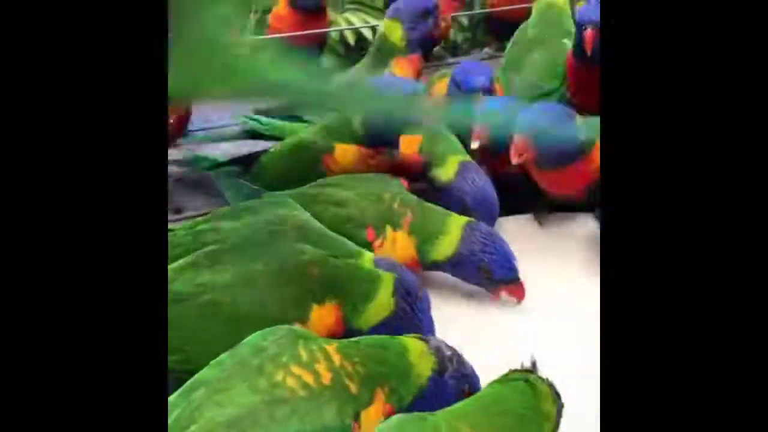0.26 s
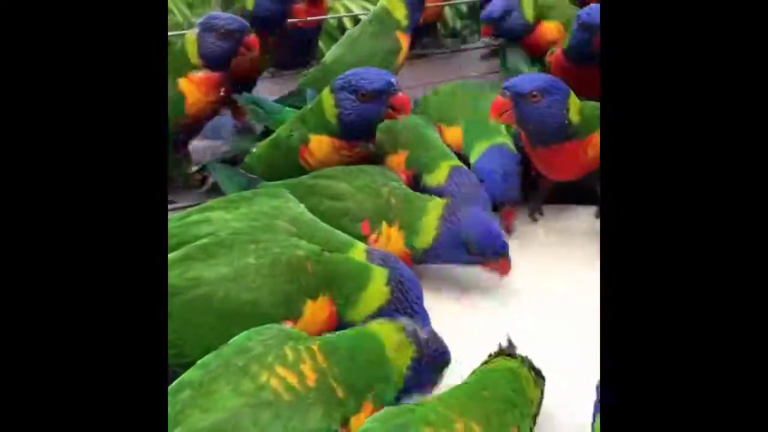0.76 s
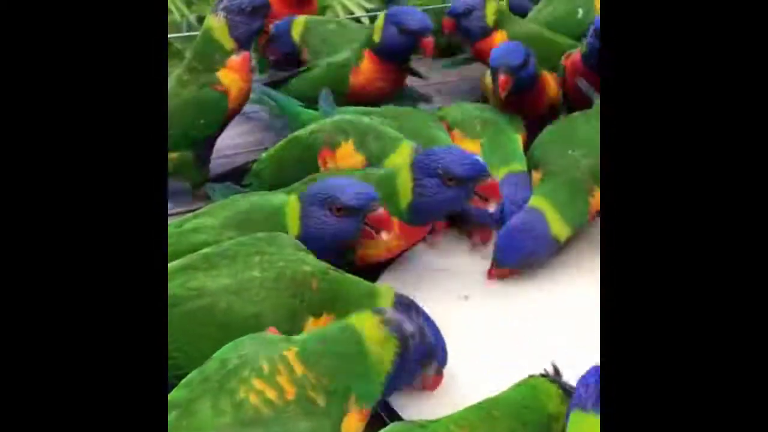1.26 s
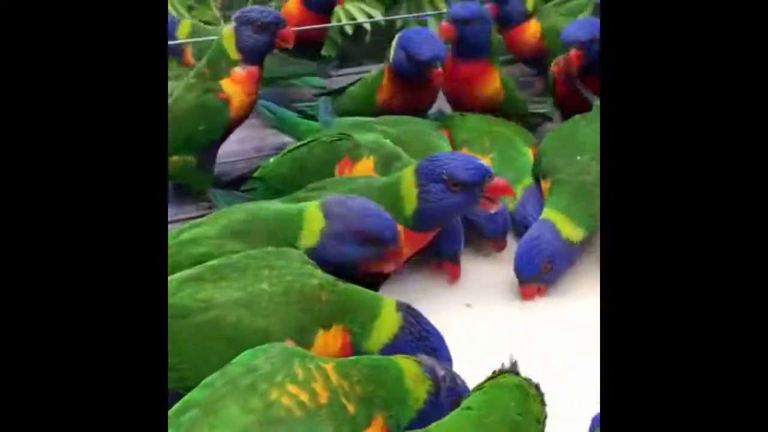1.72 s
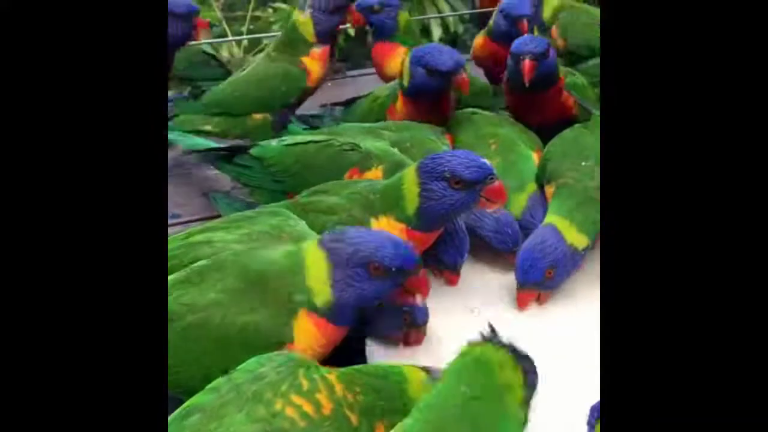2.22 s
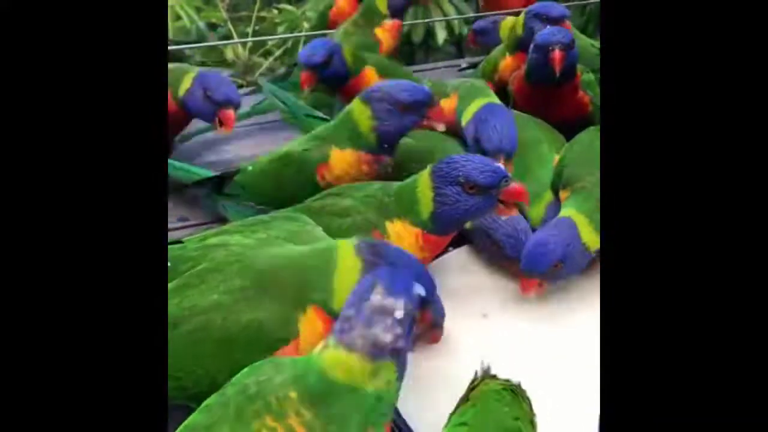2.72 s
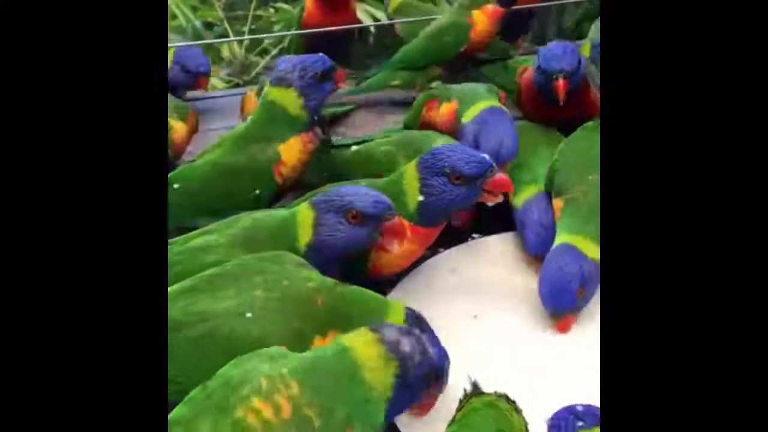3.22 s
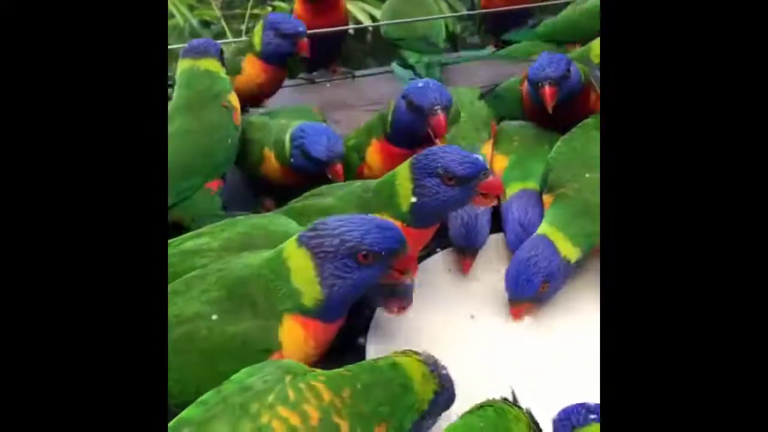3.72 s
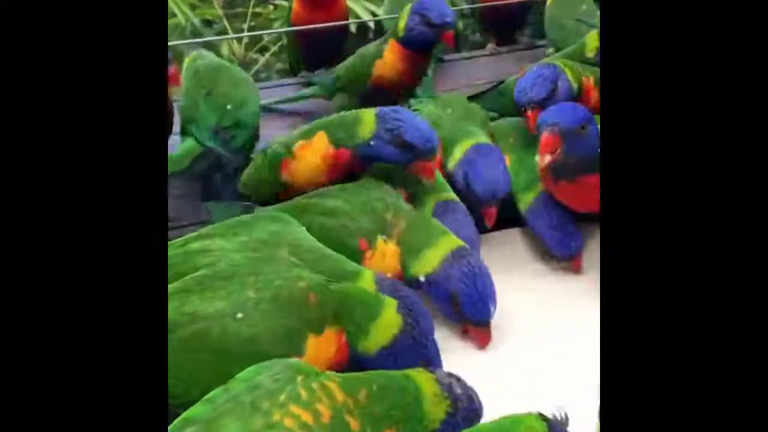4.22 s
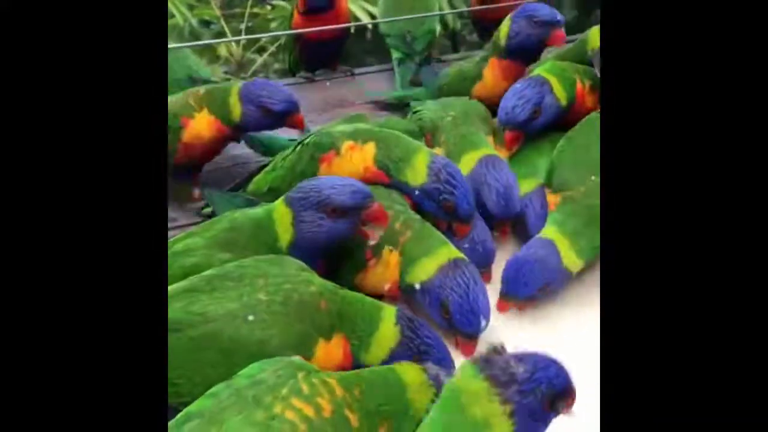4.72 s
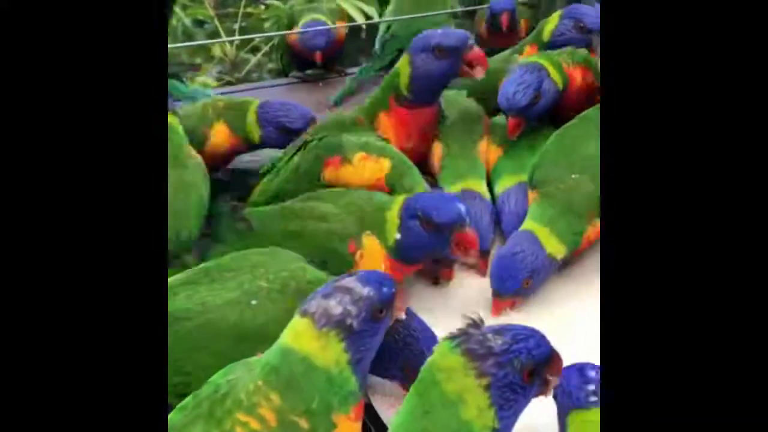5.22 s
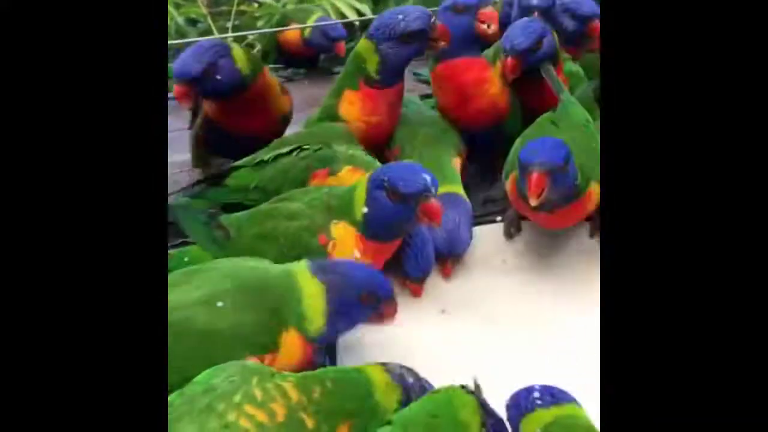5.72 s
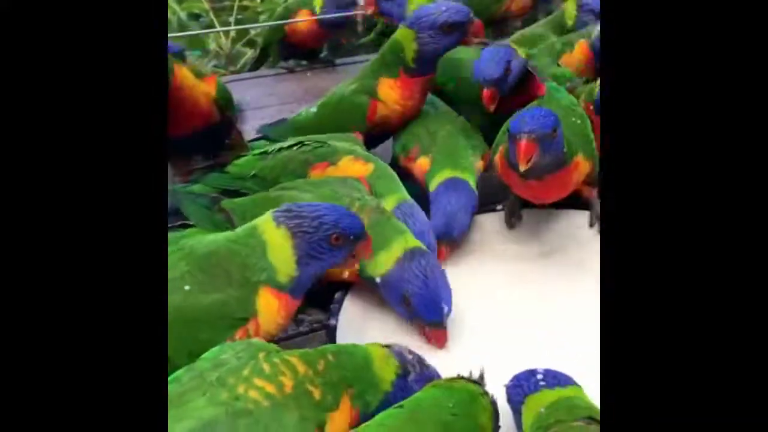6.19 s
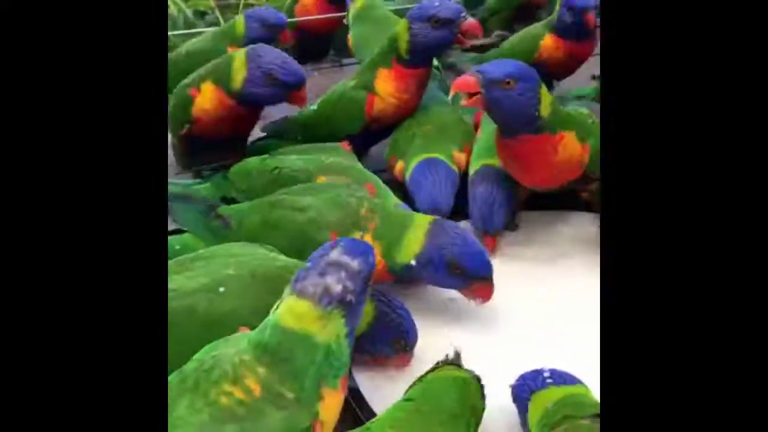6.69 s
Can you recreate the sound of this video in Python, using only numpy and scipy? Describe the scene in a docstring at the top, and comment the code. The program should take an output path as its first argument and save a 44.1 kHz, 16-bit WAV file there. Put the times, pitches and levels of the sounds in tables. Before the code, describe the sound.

A sharp, high whistle opens the sound, and a bird flaps past close by, with about seven quick, low puffs of wing beats fading by 0.5 seconds. From there a flock of small parrots calls continuously near the microphone. Short, harsh, fluttering screeches follow one another with hardly a gap and dominate the first second. Clean, high whistles that glide and warble overlap them, clustering around 1.3 to 1.8, 2.1 to 2.8 and 3.3 to 4 seconds. At about 4.6 seconds one raspy screech swells into the loudest call. Whistles and screeches then mix busily until about 6 seconds, when the screeches become softer and duller while quick whistles continue to the end, near 7 seconds. The setting is outdoors with very little echo. Faint chirps from birds further off and a soft rumble and hiss of air lie underneath throughout.

```python
"""A sharp whistle and a bird flapping past, then a close flock of small parrots at an outdoor feeding dish.
Their harsh, fluttering screeches overlap with clean, warbling whistles. Both come from the syrinx,
a bird's voice box: it sings a gliding tone for a whistle, and its membranes flutter and chop the tone
for a screech. Each wing beat is a low puff of air. Faint far chatter and air rumble lie below."""
import sys
import numpy as np
from scipy import signal
from scipy.fft import rfft, irfft
from scipy.io import wavfile
from scipy.ndimage import uniform_filter1d, minimum_filter1d

SR = 44100
rng = np.random.default_rng(int(sys.argv[2]) if len(sys.argv) > 2 else 0)


def file_out(sig):
    """Save sig as 16-bit WAV at sys.argv[1]."""
    # one column per channel
    cols = np.atleast_2d(sig).T
    # limit, then scale
    lim = np.clip(cols, -1, 1)
    pcm = np.round(lim * 32767).astype(np.int16)
    wavfile.write(sys.argv[1], SR, pcm)


N = 306495
CUTOFF_HZ = 12700   # top of the sound's range


def from_db(db):
    """Turns a level in dB into a number to multiply by."""
    return 10 ** (np.asarray(db) / 20)


def rms_one(x):
    """Scales x to an average strength (rms) of 1."""
    return x / np.sqrt(np.mean(x ** 2) + 1e-20)


def coloured(x, gain_db):
    """Turns each frequency in x up or down by gain_db(hz)."""
    hz = np.maximum(np.arange(len(x) // 2 + 1) * SR / len(x), 1)
    return irfft(rfft(x) * from_db(gain_db(hz)), len(x))


def at_hz(points, hz):
    """Reads a level between the rows of a table, with octaves evenly spaced."""
    table_hz, table_db = np.transpose(points)
    return np.interp(np.log(hz), np.log(table_hz), table_db)


def bump(hz, centre_hz, half_width_hz, db):
    """A rounded peak around one frequency, or a dip if db is negative."""
    return db / (1 + ((hz - centre_hz) / half_width_hz) ** 2)


def wobble(size, rate_hz):
    """A random wiggle of strength 1 that changes about rate_hz times a second."""
    r = np.exp(-2 * np.pi * rate_hz / SR)
    return rms_one(signal.lfilter([1], [1, -2 * r, r * r], rng.standard_normal(size + 2000))[2000:])


def fades(t, rise_s, fall_s):
    """Gives a call a soft start and end."""
    return np.sin(np.pi / 2 * np.clip(np.minimum(t / rise_s, (t[-1] - t) / fall_s), 0, 1)) ** 2


def swell(t, early_db, late_db):
    """Slides a call's loudness from an early level to a late one."""
    return from_db(np.interp(t / t[-1], [.2, .8], [early_db, late_db]))


def add(out, start_s, sound):
    """Mixes a sound into out at its start time."""
    at = round(start_s * SR)
    out[at:at + len(sound)] += sound[:N - at]


# The air's noise from low to high: f/Hz, relative level/dB
AIR_COLOUR = [(20, -36), (45, -2.5), (110, 2), (300, -11), (800, -10), (4000, -10), (12000, -19)]
# How the gusts rise and fall: t/s, relative level/dB
GUST_LEVELS = [(0.63, -52.5), (3.13, -58.5), (6.95, -51)]


def air():
    """Moving air rumbles and hisses; the hiss follows the gusts less than the rumble does."""
    split_hz, lift_db, hiss_share = 250, 5.5, .73
    noise = rng.standard_normal(N)
    rumble = coloured(noise, lambda hz: at_hz(AIR_COLOUR, hz) - 90 * (hz > split_hz))
    hiss = coloured(noise, lambda hz: at_hz(AIR_COLOUR, hz) - 90 * (hz <= split_hz))
    gusts_db = np.interp(np.arange(N) / SR, *np.transpose(GUST_LEVELS))
    swing_db = gusts_db - gusts_db.mean() + .31 * wobble(N, 1.1)
    mixed = rumble * from_db(swing_db) + hiss * from_db(hiss_share * swing_db)
    return from_db(gusts_db.mean() + lift_db) * mixed / np.std(rumble + hiss)


def far_chatter(count):
    """Birds further off give short, faint, gliding calls at random times."""
    out = np.zeros(N)
    for when, span, height, loudness in rng.random((count, 4)):
        t = np.arange(round((.02 + .05 * span) * SR)) / SR
        pitch_hz = 1300 * 3 ** height * (1 + .08 * wobble(len(t), 15) + .03 * wobble(len(t), 300))
        phase = 2 * np.pi * np.cumsum(pitch_hz) / SR
        add(out, when * N / SR, np.sin(phase) * from_db(-54 + 14 * loudness) * fades(t, .008, .008))
    return out


def wings():
    """A bird flaps past: each downstroke pushes a short, low wave of air, over a fading gust."""
    first_s, gap_s, nearest_beat, thump_hz = .051, .071, 2, 62
    out = np.zeros(N)
    t = np.arange(round(.07 * SR)) / SR
    push = -np.sin(2 * np.pi * thump_hz * t) * (t / .0062) * np.exp(1 - t / .0067)
    for beat in range(7):
        level_db = -15 - 1.3 * (beat - nearest_beat) ** 2
        add(out, first_s + gap_s * beat, from_db(level_db) * push)
    low_band = signal.butter(2, [35, 95], "band", fs=SR, output="sos")
    gust = from_db(-27) * rms_one(signal.sosfilt(low_band, rng.standard_normal(N)))
    return out + gust * np.clip(1 - np.arange(N) / SR / .5, 0, 1)   # gone in half a second


# The overtone an octave up is strong where the throat rings with it.
# Columns: note f/Hz, overtone level/dB against the note at medium effort
OCTAVE_LEVELS = [(1500, -9), (2400, 10.5), (2900, 0.5), (3300, -8), (4100, -16)]
# One whistled note a row: start t/s, length t/s, glide from f/Hz, glide to f/Hz, warble swing f/Hz,
# warble half-turns (it settles after the last whole one), early level/dB, late level/dB
WHISTLE_NOTES = [ (.001, 0.051, 3780, 3690, -360, 1.97, -10, -10),
                 (0.206, 0.055, 3035, 3280, -230, 0.77, -19.5, -14),
                 (0.424, 0.038, 2370, 2320, 62, 0.81, -34.5, -34.5),
                 (0.465, 0.019, 2030, 2120, 5, 1, -36, -23),
                 (1.136, 0.086, 4150, 4640, -250, 1.1, -26, -22.5),
                 (1.34, 0.033, 2370, 3120, -61, 1.7, -18, -24),
                 (1.362, 0.039, 2467, 2540, 0, 0.89, -22, -19),
                 (1.393, 0.021, 2580, 3410, 250, 0.91, -20, -12.5),
                 (1.411, 0.015, 4210, 4240, 5, 1, -8, -9), (1.425, 0.041, 2850, 3220, -6, 1.3, -16.5, -9.5),
                 (1.459, 0.021, 2700, 2505, -47, 1.3, -18, -20), (1.479, 0.015, 3200, 3150, 0, 1, -16, -22),
                 (1.449, 0.062, 4230, 4087, -600, 1.64, -13, -10.5),
                 (1.508, 0.038, 3100, 3470, -3, 1, -26.5, -21.5),
                 (1.546, 0.05, 2424, 3210, 359, 1.16, -27, -23.5),
                 (1.64, 0.036, 2650, 2880, -6, 1, -31, -21),
                 (1.672, 0.022, 2450, 3080, -150, 1.3, -22.5, -21),
                 (1.693, 0.041, 4550, 4310, -3, 1, -10, -9.5),
                 (1.728, 0.052, 3060, 3230, -74, 1.6, -15, -11),
                 (1.781, 0.022, 4210, 4340, -3, 1, -11.5, -15.5),
                 (2.074, 0.064, 4120, 4280, 12, 1.1, -19.5, -20.5),
                 (2.118, 0.068, 3110, 3166, -28, 0.83, -22, -23.5),
                 (2.174, 0.069, 3980, 4350, 262, 1.15, -24, -14.5),
                 (2.278, 0.052, 3350, 3000, 5, 1.1, -13, -12.5), (2.319, 0.02, 3960, 3780, 2, 1, -7, -5.5),
                 (2.336, 0.028, 3080, 3070, 4, 1, -14, -14), (2.36, 0.021, 3930, 3950, 0, 1, -5.5, -11),
                 (2.38, 0.027, 3020, 3680, -200, 1.2, -12.5, -12),
                 (2.401, 0.056, 4400, 3950, 18, 1, -9.5, -16),
                 (2.435, 0.067, 3203, 3200, -8, 0.76, -13.5, -13.5),
                 (2.599, 0.086, 3185, 3620, 20, 1.6, -20.5, -19),
                 (2.765, 0.063, 4090, 3933, -600, 1.75, -14, -8),
                 (2.976, 0.082, 3110, 3610, 11, 0.58, -24, -19),
                 (3.282, 0.12, 4490, 4650, 198, 4.4, -17, -19),
                 (3.372, 0.073, 3720, 3540, -280, 4.9, -9.5, -12.5),
                 (3.449, 0.034, 3450, 3460, -6, 1, -16, -19), (3.497, 0.04, 2483, 2410, -14, 1, -20.5, -25),
                 (3.548, 0.089, 1500, 1550, -6, 1.6, -36.5, -31),
                 (3.566, 0.06, 4080, 4270, 97, 2.9, -19, -11.5),
                 (3.587, .05, 2706, 3315, -100, 2.2, -22, -18), (3.624, 0.017, 3235, 3100, -5, 1, -17, -21),
                 (3.634, 0.033, 2700, 3100, -12, 1.2, -17.5, -19.5),
                 (3.664, 0.16, 2930, 3590, 158, 2.58, -21.5, -16),
                 (3.673, 0.096, 2390, 2040, 110, 1.9, -31.5, -40),
                 (3.978, 0.065, 4020, 4080, -480, 1.7, -11.5, -6),
                 (4.159, 0.15, 2850, 3190, 209, 1.95, -28.5, -30.5),
                 (4.39, 0.1, 4850, 5600, 149, 1.3, -23, -19),
                 (4.86, 0.068, 4180, 3880, -550, 1.3, -12, -18),
                 (4.89, 0.031, 3770, 3880, 9, 0.82, -18, -11.5),
                 (4.916, 0.047, 4540, 4460, 1, 1, -19.5, -23),
                 (4.943, 0.063, 3330, 3314, 13, 0.6, -18.5, -15),
                 (4.977, 0.067, 1447, 1520, -5, 0.95, -25, -25), (5.077, 0.048, 3900, 3700, 2, 1, -15, -19),
                 (5.116, 0.092, 2716, 2785, 73, 1.22, -22, -19),
                 (5.177, 0.05, 4150, 4440, 109, 1.45, -13.5, -9),
                 (5.22, .054, 4380, 4170, -400, 1.34, -8, -14.5),
                 (5.272, 0.054, 3540, 3580, 514, 1.25, -13.5, -17),
                 (5.382, 0.0324, 2580, 2840, 0, 1.2, -33.5, -25),
                 (5.412, 0.022, 2450, 3640, -250, 1.5, -25.5, -22),
                 (5.434, 0.035, 4360, 4390, -1, 1, -15.5, -12),
                 (5.465, 0.062, 3155, 3180, -150, 0.99, -22.5, -17),
                 (5.523, 0.028, 4150, 4400, 0, 1, -14, -22), (5.875, 0.07, 2185, 2063, -8, 1.8, -29, -20),
                 (5.88, 0.087, 3010, 3420, 204, 1.2, -23, -31),
                 (5.94, 0.046, 3600, 3835, 156, 1.28, -14.5, -11.5),
                 (5.975, 0.085, 3905, 3880, -520, 1.97, -10.5, -15),
                 (6.05, 0.04, 2920, 2940, 4, 1.3, -19, -21),
                 (6.097, 0.068, 2837, 3310, 372, 2.01, -19.5, -16),
                 (6.153, 0.015, 3970, 4300, 12, 0.43, -5, -6),
                 (6.169, 0.037, 2770, 3275, -100, 1.07, -18, -15),
                 (6.203, 0.02, 4045, 4080, 58, 1.4, -7.5, -8),
                 (6.254, 0.054, 4160, 4650, 83, 0.98, -26.5, -20),
                 (6.304, 0.05, 2840, 2660, 132, 1.8, -19.5, -16.5),
                 (6.352, 0.042, 3397, 2780, 79, 1.6, -14, -19),
                 (6.399, 0.11, 2980, 3170, 14, 1.5, -25, -25.5),
                 (6.514, 0.076, 3960, 4340, -400, 2.12, -24.5, -18.5),
                 (6.586, 0.078, 3340, 3350, 12, 1, -20, -24.5),
                 (6.672, 0.068, 3940, 3980, 351, 1.12, -15.5, -21),
                 (6.708, 0.088, 3190, 3190, -10, 1.4, -25, -27),
                 (6.754, 0.04, 4040, 3240, 6, 1, -15.5, -38),
                 (6.797, 0.055, 3240, 4450, 246, 1.1, -17.5, -13),
                 (6.851, 0.071, 3193, 3260, -11, 0.85, -21.5, -22.5)]


def whistles():
    """The syrinx sings tones that glide and warble; the harder the bird blows, the more overtones."""
    out = np.zeros(N)
    for start, length, from_hz, to_hz, swing_hz, turns, early_db, late_db in WHISTLE_NOTES:
        t = np.arange(round(length * SR)) / SR
        waver = .0045 * wobble(len(t), 300) + .006 * wobble(len(t), 30)
        warble = np.sin(np.pi * np.minimum(turns * t / length, max(1, int(turns))))
        glide_hz = from_hz + (to_hz - from_hz) * t / length
        pitch_hz = (glide_hz + swing_hz * warble) * (1 + waver)
        phase = 2 * np.pi * np.cumsum(pitch_hz) / SR
        effort = swell(t, early_db, late_db)
        octave = from_db(at_hz(OCTAVE_LEVELS, pitch_hz) + 3.45 * wobble(len(t), 47))
        octave *= (effort / from_db(-16)) ** .41
        upper = np.sqrt(octave) * from_db(-14.5 - (pitch_hz - 3000) / 150)   # weaker on high notes
        tone = np.sin(phase) + octave * np.sin(2 * phase)
        tone += upper * (np.sin(3 * phase) + .43 * np.sin(4 * phase))
        ragged = from_db(wobble(len(t), 110)) * (1 + .04 * wobble(len(t), 600))
        add(out, start, np.sqrt(2) * tone * effort * ragged * fades(t, .003, .004))
    return out


# Kinds of screech, by name: roughness (0 to 1), flutter depth
# (above 0 the pitch falls in each flutter, below 0 it rises)
SCREECH_VOICES = {"clear": (.18, 0), "burr": (.47, .4), "rasp": (.72, .3), "hoarse": (.75, 0),
                  "stutter": (.35, -.75), "rattle": (.45, .68)}


def fluttering_syrinx(t, pitch_hz, peak_hz, voice):
    """Membranes buzz with many harmonics (multiples of the pitch); an uneven flutter chops the buzz."""
    flutter_hz, stutter_hz = 78, 34.5   # fast chopping; slow, separate chirps
    rough, depth = SCREECH_VOICES[voice]
    rough = rough * np.clip(.3 + t / .05, 0, 1)   # starts clearer, then breaks up
    rate_hz = stutter_hz if depth < -.35 else flutter_hz * (1 + .12 * wobble(len(t), 20))
    cycle = np.cumsum(rate_hz * np.ones(len(t))) / SR % 1
    progress = t / t[-1]
    # The pitch scoops up at the start and sags at the end.
    arch = 1 - .55 * rough.max() * np.exp(-progress / .11) - .14 * rough * progress ** 2.5
    sweep = uniform_filter1d(.55 * depth * abs(depth) * (.5 - cycle), size=60)
    chaos = rough * (.07 * wobble(len(t), 500) + .045 * wobble(len(t), 15))
    phase = 2 * np.pi * np.cumsum(pitch_hz * arch * (1 + sweep + chaos)) / SR
    harmonics = np.arange(1, int(CUTOFF_HZ / pitch_hz) + 1)[:, None]
    strengths = from_db([5 * wobble(len(t), 10) for _ in harmonics])   # each comes and goes
    strengths *= from_db(bump(harmonics * pitch_hz, peak_hz, 350, db=8))   # louder near the throat peak
    buzz = rms_one(np.sum(strengths * np.cos(harmonics * phase + harmonics ** 2), axis=0))
    breath = .65 * rough * rng.standard_normal(len(t))
    chop = from_db(-26 * depth ** 2 * np.cos(np.pi * cycle) ** 4)
    flicker = from_db(5 * rough * wobble(len(t), 600) + .6 * wobble(len(t), 33))
    return (buzz + breath) * chop * flicker


# How the throat lifts or weakens each frequency: f/Hz, level/dB
THROAT_COLOUR = [(400, -18), (1000, -9), (1900, -6), (2600, 0.5), (4000, -0.5), (5800, 3), (7300, -2.5),
                 (9000, -19.5)]


def throat_and_beak(t, source, peak_hz, treble_db):
    """The throat shapes the buzz and rings at one peak; the opening beak lets out the highest part."""
    tilt_db = .23 * (treble_db + 10)   # per octave above 2200 Hz

    def throat_db(hz):
        slope_db = tilt_db * np.log2(np.maximum(hz / 2200, 1))
        return at_hz(THROAT_COLOUR, hz) + bump(hz, peak_hz, 350, db=4) + slope_db

    treble = coloured(source, lambda hz: treble_db - 8e-7 * (hz - 8700) ** 2 - 60 * (hz < 7500))
    beak_opening = np.clip(t / .05, 0, 1) * from_db(3 * wobble(len(t), 14))
    return rms_one(coloured(source, throat_db) + beak_opening * treble)


# One screech a row: start t/s, end t/s, pitch f/Hz, early level/dB, late level/dB,
# throat peak f/Hz, relative treble level/dB, kind of voice
SCREECH_CALLS = [ (0.14, 0.284, 1301, -10.5, -13, 2900, -9, "rasp"),
                 (0.255, 0.4, 1044, -11.5, -14, 4140, -5.5, "burr"),
                 (0.473, 0.698, 1083, -6, -15.5, 4530, -11, "burr"),
                 (0.672, 0.821, 1030, -17, -14.5, 3750, -17.5, "rasp"),
                 (0.792, 0.949, 1057, -6, -14.5, 3850, -15, "rasp"),
                 (0.987, 1.176, 1041, -9.5, -14.5, 3920, -17, "burr"),
                 (1.203, 1.35, 1020, -21, -13.5, 3780, -1.5, "burr"),
                 (1.343, 1.517, 1290, -19, -18.5, 2840, -3.5, "rasp"),
                 (1.486, 1.594, 1380, -26.5, -33.5, 3260, -23, "hoarse"),
                 (1.672, 1.812, 1303, -27.5, -14, 2940, -11, "hoarse"),
                 (1.795, 1.95, 1294, -21.5, -15.5, 3300, -26, "stutter"),
                 (1.922, 2.083, 1047, -8, -11.5, 4040, -11, "burr"),
                 (2.151, 2.252, 1142, -21, -31, 2500, -19, "clear"),
                 (2.215, 2.309, 735, -11, -13, 5340, -8, "clear"),
                 (2.287, 2.475, 1378, -16.5, -28, 3400, -15, "burr"),
                 (2.482, 2.641, 1101, -14.5, -14, 4100, -14.5, "rasp"),
                 (2.652, 2.778, 1356, -17.5, -16, 3610, -4.5, "rasp"),
                 (2.873, 3.034, 950, -18, -16, 4320, -2.5, "burr"),
                 (3.025, 3.137, 1240, -12, -17, 5160, -10, "stutter"),
                 (3.152, 3.22, 1110, -34, -31, 4480, -30, "clear"),
                 (3.195, 3.305, 1010, -11, -17.5, 4250, -20, "rasp"),
                 (3.318, 3.565, 1218, -18.5, -19, 3280, -12.5, "rasp"),
                 (3.537, 3.781, 1447, -21, -34.5, 4000, -5, "hoarse"),
                 (3.771, 3.972, 1205, -14, -14, 3970, -10, "burr"),
                 (3.946, 4.026, 1322, -11, -26, 3580, 2, "hoarse"),
                 (4.008, 4.144, 1024, -14.5, -15, 4220, -10, "burr"),
                 (4.253, 4.379, 1066, -35.5, -21.5, 1060, -8, "burr"),
                 (4.355, 4.533, 964, -17.5, -12, 4100, -7, "burr"),
                 (4.529, 4.721, 1252, -22.5, 7, 4140, -6.5, "rasp"),
                 (4.727, 4.857, 1272, -17.5, -19, 4440, -20, "rasp"),
                 (4.821, 4.989, 1203, -19, -24, 3600, -3.5, "hoarse"),
                 (4.98, 5.094, 1197, -11.5, -11, 3340, -7.5, "rasp"),
                 (5.067, 5.208, 1444, -18, -20, 3460, -13, "hoarse"),
                 (5.188, 5.325, 1144, -15, -17, 3660, -19, "rasp"),
                 (5.445, 5.622, 1107, -13, -17.5, 3700, -12.5, "rasp"),
                 (5.6, 5.777, 1265, -22, -18, 5250, -17, "burr"),
                 (5.749, 5.894, 1315, -27.5, -19.5, 1990, -11, "rasp"),
                 (5.873, 6.056, 968, -19, -18.5, 3480, -10, "rasp"),
                 (6.081, 6.133, 1440, -14, -12.5, 3860, 6, "clear"),
                 (6.36, 6.58, 987, -32.5, -25.5, 1600, -40, "burr"),
                 (6.541, 6.79, 975, -19, -19, 1980, -28, "rattle")]


def screeches():
    """The nearby parrots screech: each harsh buzz leaves the syrinx through the throat and beak."""
    out = np.zeros(N)
    for start, end, pitch_hz, early_db, late_db, peak_hz, treble_db, voice in SCREECH_CALLS:
        t = np.arange(round((end - start) * SR)) / SR
        source = fluttering_syrinx(t, pitch_hz, peak_hz, voice)
        call = throat_and_beak(t, source, peak_hz, treble_db)
        add(out, start, call * swell(t, early_db, late_db) * fades(t, .028, .024))
    return out


def echoes(calls, decay_s=.14, level_db=-15):
    """Calls scatter off bodies, rail and leaves, leaving a tail that drops 60 dB in decay_s."""
    t = np.arange(round(.3 * SR)) / SR
    tail = rng.standard_normal(len(t)) * from_db(-60 * t / decay_s)
    tail *= from_db(level_db) / np.sqrt(np.sum(tail ** 2))
    return signal.fftconvolve(calls, tail)[:N]


def scene():
    """Mixes the calls, their echoes, the wings and the air into one channel."""
    calls = whistles() + screeches() + far_chatter(count=150)
    return (calls + echoes(calls) + wings() + air())[None]


# Two narrow dips in the treble, probably from a reflection close to the microphone.
# Columns: centre f/Hz, half-width f/Hz, level/dB
REFLECTION_DIPS = [(4800, 170, -9), (7420, 200, -12)]


def record(dry):
    """Two dips colour the sound, a limiter turns down the loudest peaks, and the very top is cut."""
    dipped = coloured(dry[0], lambda hz: sum(bump(hz, *dip) for dip in REFLECTION_DIPS))[None]
    safe_gain = np.minimum(1, .97 / np.maximum(np.abs(dipped), 1e-9))
    smooth_gain = uniform_filter1d(minimum_filter1d(safe_gain, size=201), size=201)
    top_cut = signal.cheby2(14, 70, CUTOFF_HZ, fs=SR, output="sos")
    return signal.sosfilt(top_cut, smooth_gain * dipped)


dry = scene()
out = record(dry)
file_out(out)
```